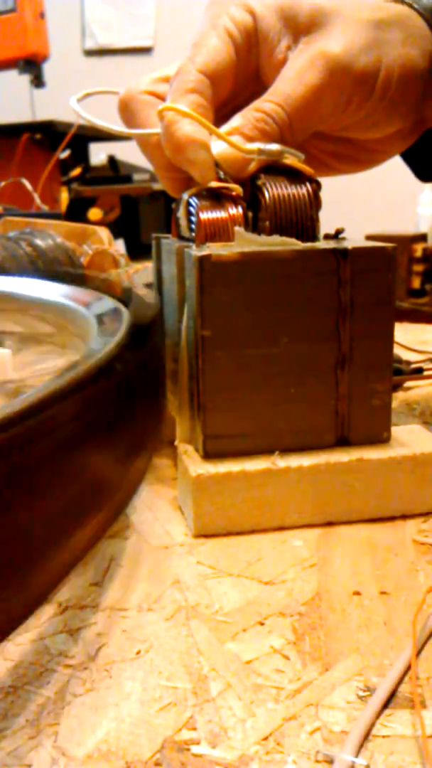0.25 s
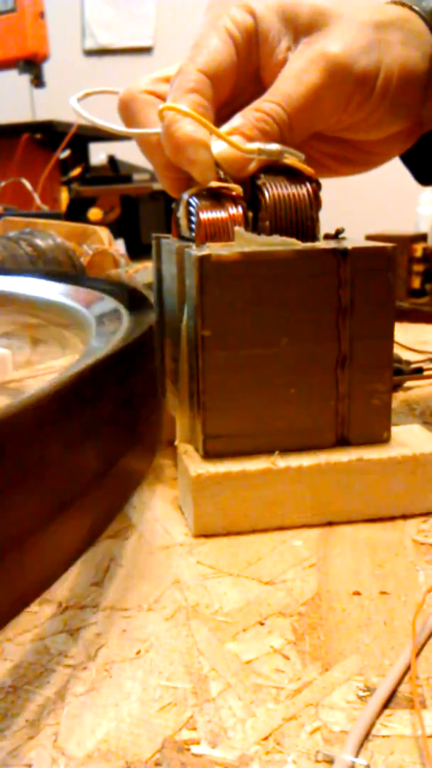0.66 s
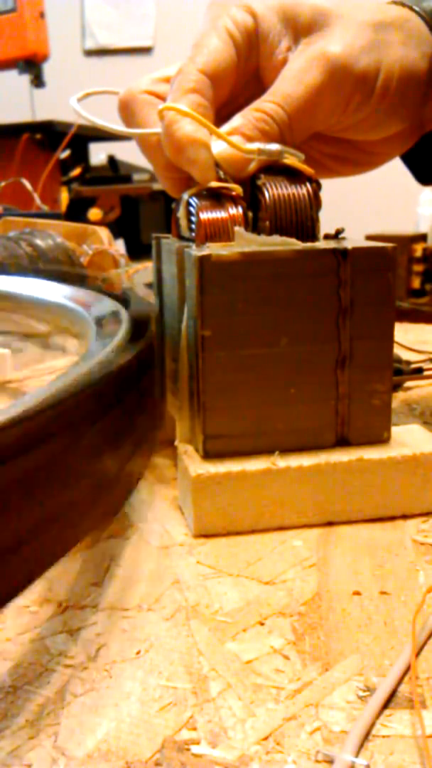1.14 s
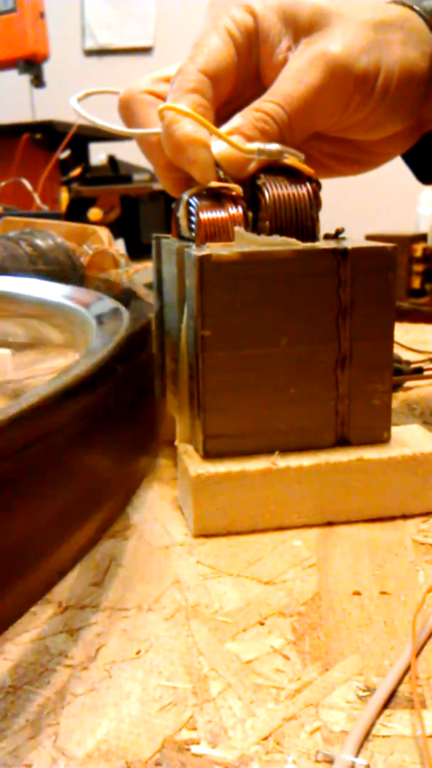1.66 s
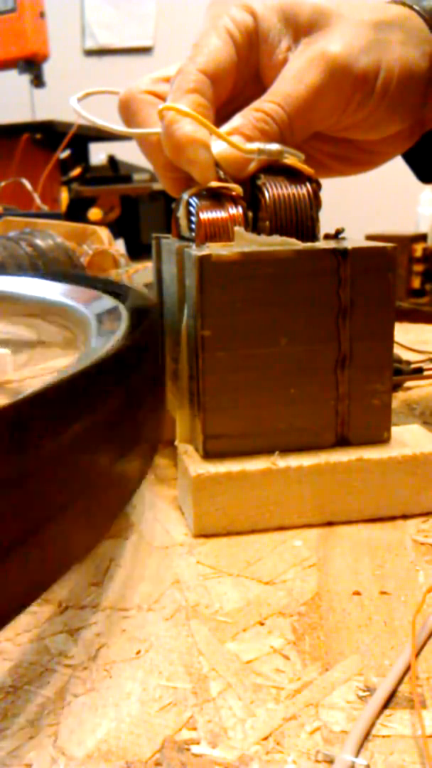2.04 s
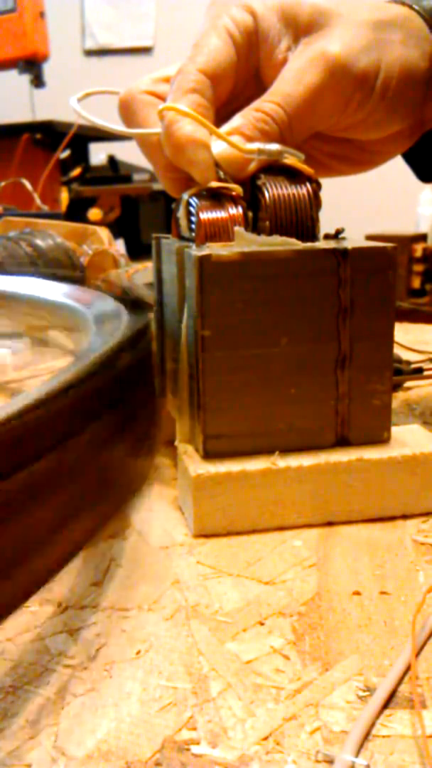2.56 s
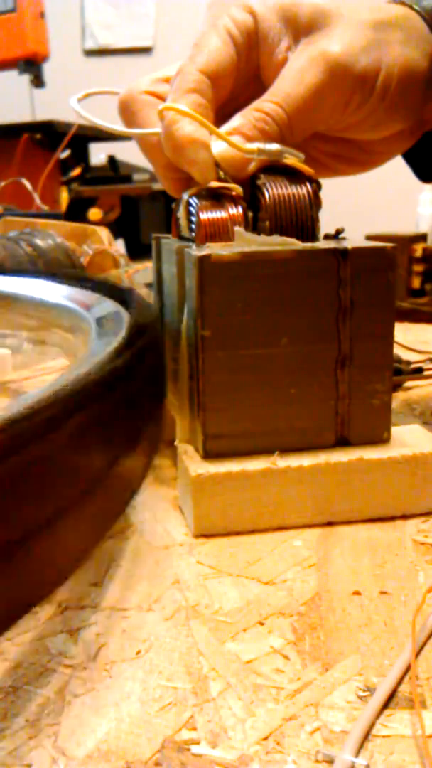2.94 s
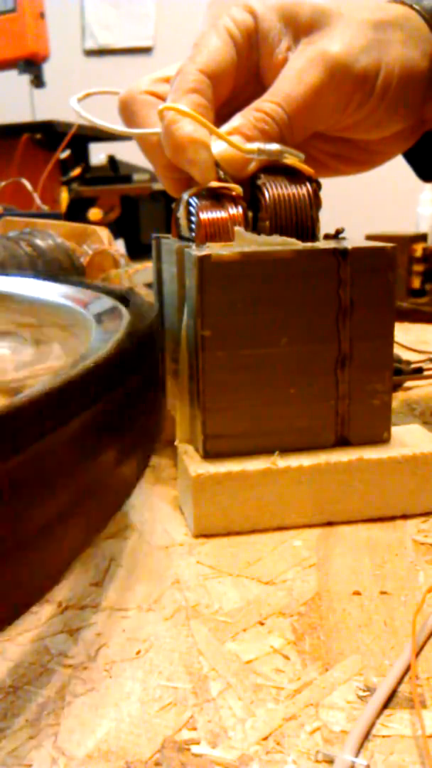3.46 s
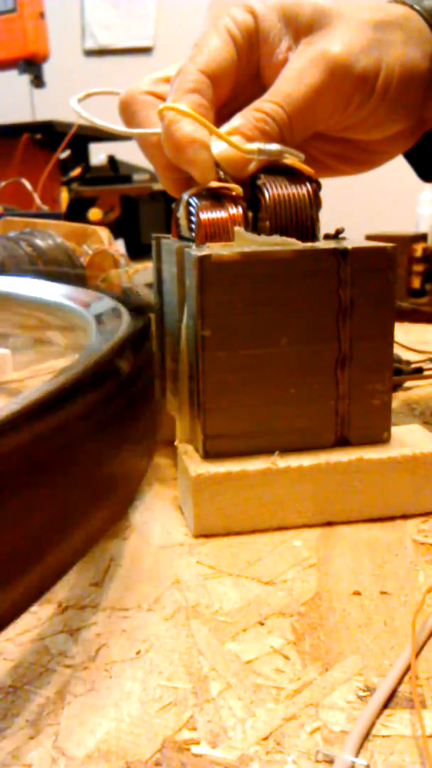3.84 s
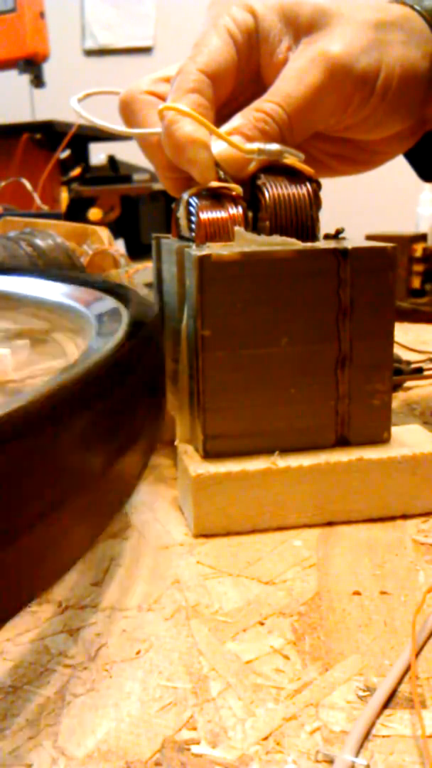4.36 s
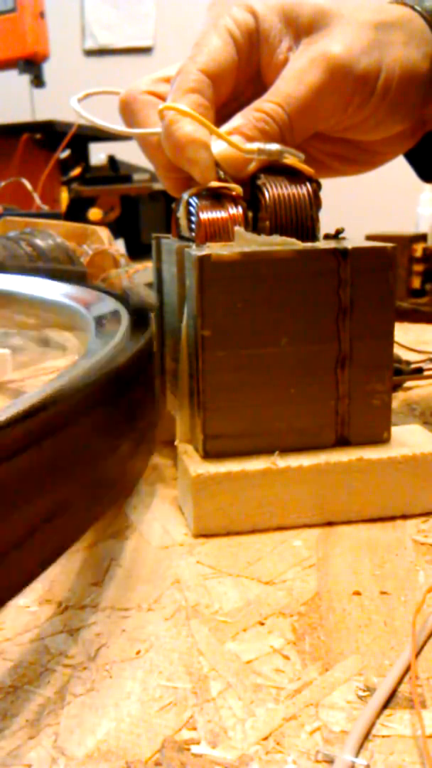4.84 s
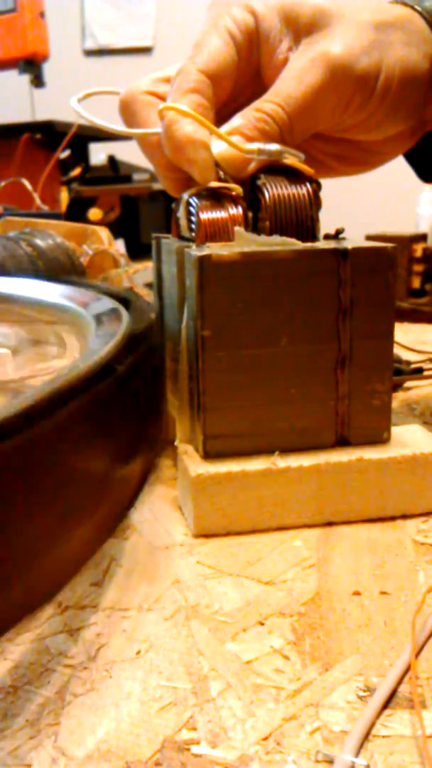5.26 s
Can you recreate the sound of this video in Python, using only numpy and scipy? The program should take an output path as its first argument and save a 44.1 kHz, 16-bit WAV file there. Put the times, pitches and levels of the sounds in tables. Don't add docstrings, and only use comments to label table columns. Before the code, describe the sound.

Close up in a small workshop, a spinning wheel rumbles through its chipboard bench, its low tone swelling and sinking. Loose parts patter on the hollow tyre and metal rim at random, giving short woody, slightly metallic knocks with brief room reflections. A strong knock with a dull thud comes at two seconds; scattered taps and ticks continue to the end over soft hiss.

```python
import sys
import numpy as np
from scipy import signal
from scipy.fft import rfft, irfft
from scipy.io import wavfile
from scipy.ndimage import uniform_filter1d

SR = 44100
rng = np.random.default_rng(int(sys.argv[2]) if len(sys.argv) > 2 else 0)


def output_pcm(signal):
    pcm = np.clip(np.atleast_2d(signal).T, -1, 1) * 32767
    wavfile.write(sys.argv[1], SR, np.round(pcm).astype(np.int16))


def field_ratio(decibels):
    return 10 ** (np.asarray(decibels, dtype=float) / 20)


N = 242991

# (pitch_hz, level_db, t60_s); t60 is the time to die away by 60 dB
RIM_MODES = [(1589, 6, 0.031), (1635, -7, .2), (1688, -8, .16), (1804, -13, .35), (1828, -10, .45),
             (1930, 9.5, 0.01), (2061, -10.5, 0.044), (2095, 14, 0.014), (2360, -13.5, 0.16),
             (2442, -7, 0.1)]


def rms_one(x):
    return x / np.sqrt(np.mean(x ** 2) + 1e-20)


def at_hz(points, hz):
    table_hz, value = np.transpose(points)
    return np.interp(np.log(hz + 1e-9), np.log(table_hz), value)


def coloured(spectrum):
    hz = np.arange(N // 2 + 1) * SR / N
    white = rfft(rng.standard_normal(N))
    return rms_one(irfft(white * field_ratio(at_hz(spectrum, hz)), N))


def ring(force, hz, t60):
    radius = field_ratio(-60 / (t60 * SR))
    angle = 2 * np.pi * hz / SR
    return signal.lfilter([0, np.sin(angle)], [1, -2 * radius * np.cos(angle), radius ** 2], force + 1e-18)


def placed(times, forces, gains):
    out = np.zeros(N + forces.shape[1])
    for i, force, gain in zip((times * SR).astype(int), forces, gains):
        out[i:i + len(force)] += gain * force
    return out[:N]


def clatters(centre_hz, octaves, rise_s, fall_s):
    t = np.arange(1536) / SR
    place, fall, turn = rng.random((len(centre_hz), 3, 32, 1)).transpose(1, 0, 2, 3)
    away = (np.arange(32)[:, None] + place) / 8 - 2
    hz = np.asarray(centre_hz)[:, None, None] * 2 ** (octaves * away)
    hz = np.clip(hz, 200, 0.45 * SR)
    mode_fall_s = fall_s * field_ratio(5.0 * (fall - 1.5))
    modes = np.sin(2 * np.pi * (hz * t + turn)) * np.exp(-away ** 2 / 2 - t / mode_fall_s)
    return (1 - np.exp(-t / rise_s)) * modes.sum(axis=1) / np.sqrt(14)


def magnets():
    # (multiple of the passing rate, level_db, swing_db once a turn)
    tug = [(.39, -63, 2), (1, -46, 1.5), (2, -60, 2.5), (3, -64, 3), (4, -68, 2), (5, -58, 3),
           (5.13, -64, 2), (6, -65, 3)]
    magnet_count, start_per_s, slowing_per_s2 = 16, 21.58, 0.37
    t = np.arange(N) / SR
    phase = 2 * np.pi * (start_per_s * t - slowing_per_s2 * t ** 2 / 2)
    hum = 0
    for multiple, level_db, swing_db in tug:
        turn, own = 2 * np.pi * rng.random(2)
        swing = swing_db * np.sin(phase / magnet_count + turn)
        hum = hum + field_ratio(level_db + swing) * np.sin(multiple * phase + own)
    return np.sqrt(2) * hum


def swelling(swells, calm_db):
    fading_db_per_s, half_width_s = 0.37, 0.022
    t = np.arange(0, N, 64) / SR
    power = field_ratio(2 * (calm_db - fading_db_per_s * t))
    for s, db in swells:
        power = power + field_ratio(2 * db) * np.exp(-((t - s) / half_width_s) ** 2)
    return np.interp(np.arange(N) / SR, t, 10 * np.log10(power))


def bearing():
    # (pitch_hz, level_db per Hz)
    rumble_spectrum = [(3, -39.5), (8, -24), (31, -2.5), (41, -26), (50, -14), (63, -2), (84, -17.5),
                       (104, -3.5), (128, -4), (215, -5), (238, -19.5), (335, -16), (410, -34),
                       (700, -50.5)]
    # (time_s, level_db)
    deep_swells = [(0.23, -43.5), (0.39, -60.5), (0.62, -42.5), (0.98, -55), (1.24, -41.5), (1.52, -48),
                   (1.65, -55.5), (1.81, -44), (1.97, -46.5), (2.24, -91.5), (2.51, -47), (2.69, -47),
                   (3.0, -45), (3.17, -53.5), (3.45, -54.5), (3.8, -53), (4.13, -66), (4.36, -73),
                   (4.82, -49)]
    low_swells = [(0.13, -53), (0.27, -52), (0.45, -45), (0.71, -45.5), (0.94, -47.5), (1.12, -47.5),
                  (1.34, -43.5), (1.86, -44), (2.02, -47), (2.54, -49), (2.73, -43), (2.91, -47.5),
                  (3.0, -54), (3.32, -46), (3.6, -50), (3.79, -46.5), (4.08, -54), (4.611, -43),
                  (4.82, -50.5), (5.05, -48)]
    upper_swells = [(0.27, -49.0), (0.43, -48), (0.57, -50.1), (1.05, -49.2), (1.27, -47.5), (1.62, -50),
                    (1.79, -53.5), (1.891, -57), (2.02, -53), (2.46, -49), (2.73, -48.7), (3.19, -55.5),
                    (3.4, -45.5), (3.57, -46.5), (3.85, -50), (4.06, -49.5), (4.401, -47), (4.59, -60.5),
                    (4.808, -47), (5.148, -47)]
    calm_levels = [-54, -51, -54.5]
    rumble = coloured(rumble_spectrum)
    out = rumble.copy()
    bands_hz = [35, 90], [90, 150], [150, 235]
    for edges, swells, calm_db in zip(bands_hz, (deep_swells, low_swells, upper_swells), calm_levels):
        level_db = swelling(swells, calm_db)
        band = signal.sosfiltfilt(signal.butter(2, edges, "band", fs=SR, output="sos"), rumble)
        evened = band / np.sqrt(uniform_filter1d(band ** 2, 2000) / np.mean(band ** 2) + 0.12)
        out += evened * field_ratio(level_db - np.mean(level_db)) - band
    return field_ratio(-47.5) * out


def wheel_body(push):
    # (pitch_hz, level_db, t60_s)
    tyre_modes = [(493, 0.5, 0.027), (513, -10.5, 0.017), (633, -17, 0.022), (707, -7.5, 0.076),
                  (832, -17.5, 0.2), (899.6, -3, 0.031), (922.6, -1.5, 0.043), (1058, 3, 0.033),
                  (1144, -3, 0.019), (1147, -1.5, 0.043), (1246, -4, 0.17), (1306, 0, 0.08)]
    hub_modes = [(2500, -11, 0.011), (2800, -11, 0.017), (2778, 4.5, 0.026), (3000, -9.5, 0.13),
                 (3036, 4.5, 0.025), (3290, -3.5, 0.087), (3376, -14, 0.021), (4144, -0.5, 0.026)]
    out = 0
    for k, (hz, db, t60) in enumerate(tyre_modes + RIM_MODES + hub_modes):
        out = out + (-1) ** k * field_ratio(db) * ring(push, hz, t60)
    return out


def chatter():
    # (time_s, level_db)
    chatter_levels = [(0.0, -60.5), (0.38, -63.5), (1.26, -62), (1.85, -73), (2.0, -65.5), (2.7, -59.5),
                      (2.96, -67), (3.18, -59), (3.45, -68), (3.93, -60), (4.2, -72), (4.68, -55.5),
                      (5.12, -69.5), (5.51, -60.5)]
    happens = rng.random(N) < 250 / SR
    height_db = 3.6 * np.minimum(rng.exponential(1, N), 4)
    grains = happens * field_ratio(height_db) * rng.choice([-1, 1], N)
    grains = signal.sosfilt(signal.butter(2, [600, 2400], "band", fs=SR, output="sos"), grains)
    s, db = np.transpose(chatter_levels)
    level_db = np.interp(np.arange(N) / SR, s, db)
    return field_ratio(level_db - 9.0) * rms_one(wheel_body(grains))


def ticks():
    # (time_s, peak_db)
    tick_times = [(0.0094, -71), (0.027, -56.5), (0.3745, -52.5), (0.6563, -62), (1.8955, -55),
                  (2.013, -55), (2.574, -51), (3.3047, -49), (4.0468, -50.5), (4.093, -55.5),
                  (4.363, -55.5), (5.155, -57)]
    # (pitch_hz, level_db, t60_s)
    tick_modes = [(4050, -18, .02), (6845, -2, 0.036), (9020, -10, 0.018), (9880, -4.5, 0.017),
                  (12300, -31, 0.016), (13800, 8, 0.013)]
    s, peak_db = np.transpose(tick_times)
    click = placed(s, clatters(np.full(len(s), 8800), 0.549, 0.0018, 0.0042), field_ratio(peak_db - 0.5))
    ringing = sum(field_ratio(db) * ring(click, hz, t60) for hz, db, t60 in tick_modes)
    return click + field_ratio(-25.5) * ringing


def contacts():
    # (time_s, note_db, clatter_db, clatter_hz, edge_db)
    hard_knocks = [(0.019, -72, -66, 2360, -61), (.169, -52, -54.5, 1806, -64),
                   (.261, -44.5, -50, 1850, -57.5), (.74, -51.5, -54.5, 2137, -63),
                   (.828, -53.5, -58, 1995, -64), (1.166, -57.5, -56.5, 2160, -71),
                   (1.557, -50.5, -56, 1926, -71), (1.753, -51, -48.5, 1823, -61),
                   (1.887, -47, -46, 2100, -59), (2.015, -42.5, -36.5, 2153, -44),
                   (2.163, -57.5, -53, 1614, -67), (2.282, -49, -51, 1805, -69),
                   (2.678, -51.5, -46.5, 1676, -61), (3.374, -53.5, -56, 1780, -78),
                   (3.468, -47, -46, 1904, -57.5), (3.725, -41.5, -42, 2190, -56),
                   (4.021, -45.5, -54, 2010, -67), (4.367, -40.5, -41.5, 2180, -48.5),
                   (4.533, -68, -53, 2300, -69), (4.876, -46.5, -54.5, 1700, -65),
                   (5.082, -47, -52, 1980, -63), (5.135, -47.5, -54.5, 1980, -72),
                   (5.313, -47, -55, 1990, -67), (5.418, -53.5, -51.5, 2080, -62)]
    # (time_s, note_db, clatter_db)
    tread_taps = [(.059, -53, -63), (.182, -53.5, -81), (.579, -53.5, -59), (.928, -80, -57),
                  (1.178, -55.5, -81), (1.253, -56, -60.5), (1.262, -53.5, -72), (1.403, -53.5, -66),
                  (1.634, -52.5, -60), (2.421, -53, -63.5), (2.47, -63, -81), (2.534, -52.5, -67),
                  (2.8164, -49.5, -59), (2.969, -58.5, -59.5), (3.116, -59.5, -65), (3.278, -55, -59),
                  (3.319, -63, -62.5), (3.328, -54, -84), (3.931, -54, -59.5), (4.167, -51.5, -67),
                  (4.542, -48.5, -66)]
    lip_taps = [(0.521, -57.5, -82), (.564, -67, -76), (.615, -56.5, -61), (1.054, -63, -75),
                (1.278, -60.5, -73), (1.429, -58, -55.5), (1.46, -62, -68), (3.503, -56.5, -74),
                (4.551, -48.5, -54), (4.73, -59.5, -72), (4.765, -66, -57.5), (4.798, -51.5, -55.5),
                (5.158, -52.5, -64), (5.44, -56, -72)]
    # (time_s, note_db, clatter_db, note_hz)
    wall_taps = [(.382, -91, -52, 716), (0.394, -54.5, -57.5, 727), (.5, -54.5, -57.5, 732),
                 (.7, -66, -68, 710), (.88, -60.5, -85, 780), (.979, -52.5, -73, 776),
                 (1.274, -52, -76, 712), (1.317, -59, -65, 825), (1.365, -58, -78, 860),
                 (1.458, -55, -59, 750), (1.495, -57.5, -72, 797), (1.683, -59, -69, 723),
                 (1.814, -59, -62, 940), (2.577, -66.5, -60.5, 660), (2.603, -51, -56, 913),
                 (2.763, -59, -73, 784), (3.16, -52.5, -58, 785), (3.205, -54, -68, 666),
                 (3.234, -58, -80, 840), (3.371, -57, -55.5, 860), (3.547, -53, -56.5, 720),
                 (4.282, -55, -62, 707), (4.553, -51.5, -70, 858), (4.617, -52.5, -53.5, 787),
                 (4.705, -58, -62, 883), (4.835, -72, -71, 800), (5.248, -61, -66, 916)]
    tread_hz, lip_hz, tap_clatter_hz = 1077.6, 1282, 1967
    note_spread, tap_spread = 0.008, 0.1065
    taps = [(*tap, tread_hz) for tap in tread_taps]
    taps += [(*tap, lip_hz) for tap in lip_taps]
    taps += wall_taps
    rows = [(s, note, tread_hz, clatter, hz, edge) for s, note, clatter, hz, edge in hard_knocks]
    rows += [(s, note, hz, clatter, tap_clatter_hz, clatter - 10) for s, note, clatter, hz in taps]
    s, note_db, note_hz, clatter_db, clatter_hz, edge_db = np.transpose(rows)
    note_chance, clatter_chance = rng.standard_normal((2, len(s)))
    light = np.arange(len(s)) >= len(hard_knocks)
    note_hz = note_hz * (1 + note_spread * note_chance)
    clatter_hz = clatter_hz * (1 + tap_spread * light * clatter_chance)
    return s, note_db, note_hz, clatter_db, clatter_hz, edge_db


def swoops(note_hz, start, glide_s, fall_s):
    t = np.arange(1536) / SR
    spread = field_ratio(0.41 * rng.standard_normal((len(note_hz), 2)))
    glide = glide_s * spread[:, :1]
    fall = fall_s * spread[:, 1:]
    cycles = note_hz[:, None] * (t - (1 - start) * glide * (1 - np.exp(-t / glide)))
    return np.sin(2 * np.pi * cycles) * (1 - np.exp(-t / 0.00021)) * np.exp(-(t / fall) ** 2)


def rim():
    s, note_db, note_hz, clatter_db, clatter_hz, edge_db = contacts()
    s = s - 0.0018
    notes = placed(s, swoops(note_hz, start=0.36, glide_s=0.0016, fall_s=0.018), field_ratio(note_db - 0.2))
    knocks = placed(s, clatters(0.823 * note_hz, 0.383, 0.00036, 0.0091), field_ratio(note_db + 2.9))
    rattle = clatters(clatter_hz, 0.33, 0.0013, 0.008)
    knocks += placed(s, rattle, field_ratio(clatter_db - 1.0))
    for _ in range(2):
        wait, loss = rng.random((2, len(s)))
        knocks += placed(s + 0.006 + 0.04 * wait, rattle[::-1], field_ratio(clatter_db - 9 - 8 * loss))
    edges = clatters(np.full(len(s), 3450), 0.34, 0.0016, 0.0053)
    knocks += placed(s + 0.000899, edges, field_ratio(edge_db + 6.5))
    strikes = placed(s, np.ones((len(s), 1)), field_ratio(clatter_db))
    struck = 0
    for k, (hz, db, t60) in enumerate(RIM_MODES[1:5]):
        struck = struck + field_ratio(db - 7) * ring(np.roll(strikes, 9 * k), hz, t60)
    body = field_ratio(-34) * wheel_body(knocks + field_ratio(-18.5) * notes)
    return notes, knocks + body + struck


def thuds():
    # (time_s, peak_db)
    board_knocks = [(0.258, -78), (0.394, -58), (0.504, -64), (1.275, -65), (1.884, -68), (2.013, -39.5),
                    (2.281, -54), (2.678, -46), (3.466, -82), (3.721, -63), (4.018, -67), (4.166, -68),
                    (4.364, -47), (4.795, -47.5), (5.313, -66)]
    s, peak_db = np.transpose(board_knocks)
    return placed(s, clatters(np.full(len(s), 540), 0.3, 0.0005, 0.014), field_ratio(peak_db - 1))


def shop(x):
    # (pitch_hz, t60_s)
    room_t60 = [(300, 0.9), (1000, 0.56), (2000, 0.51), (3500, 0.4), (7000, 0.05)]
    # (pitch_hz, level_db)
    room_colour = [(400, -1), (1000, 1), (1800, -5), (2300, -4), (3200, 4), (7000, -6)]
    t = np.arange(SR // 2) / SR
    tail = 0
    edges = 300 * 2.0 ** np.arange(0, 5.5, 0.5)
    for low, high in zip(edges, edges[1:]):
        noise = rng.standard_normal(len(t))
        band = signal.sosfilt(signal.butter(2, [low, high], "band", fs=SR, output="sos"), noise)
        hz = np.sqrt(low * high)
        tail = tail + band * field_ratio(at_hz(room_colour, hz) - 60 * t / at_hz(room_t60, hz))
    tail = tail * (1 - np.exp(-t / 0.0058))
    return signal.fftconvolve(x, tail / np.linalg.norm(tail))[:N]


def scene():
    hum, rumble = magnets(), bearing()
    faint_chatter = chatter()
    tick = ticks()
    notes, knocks = rim()
    clatter = knocks + faint_chatter + thuds()
    near = field_ratio(-11) * notes + field_ratio(-9) * tick
    room = field_ratio(-12.5) * shop(clatter + near)
    return (hum + rumble + notes + clatter + tick + room)[None]


def low_pass(x):
    return signal.sosfilt(signal.butter(12, 15660, fs=SR, output="sos"), x)


def record(dry):
    # (pitch_hz, level_db per Hz)
    hiss_spectrum = [(240, -42), (400, 12), (605, 4), (972, 4), (1070, 3), (1420, -6), (2150, -7),
                     (3570, -13), (15500, -50)]
    heard = dry + field_ratio(-81 + 14.0) * coloured(hiss_spectrum)
    top_cut = signal.ellip(12, 0.5, 60, 15640, fs=SR, output="sos")
    heard = signal.sosfilt(top_cut, heard)
    return low_pass(heard)


dry = scene()
out = record(dry)
output_pcm(out)
```